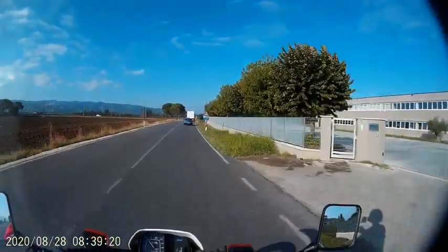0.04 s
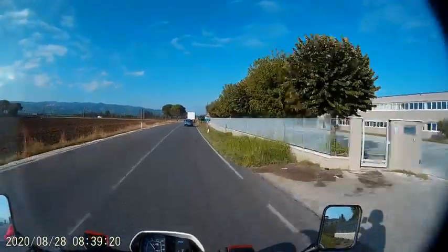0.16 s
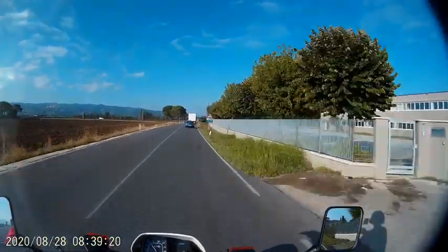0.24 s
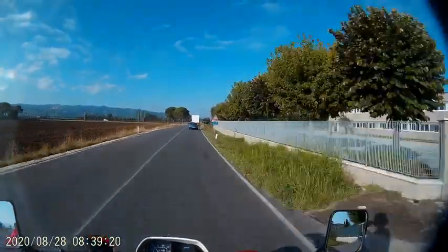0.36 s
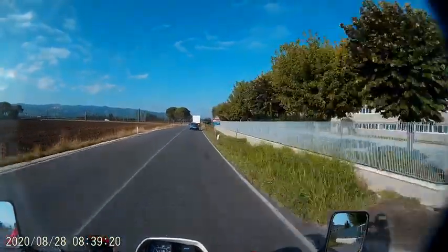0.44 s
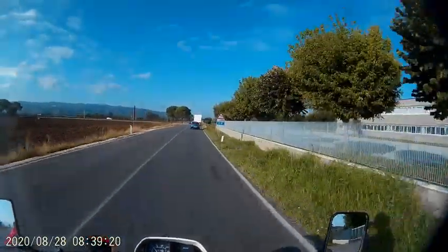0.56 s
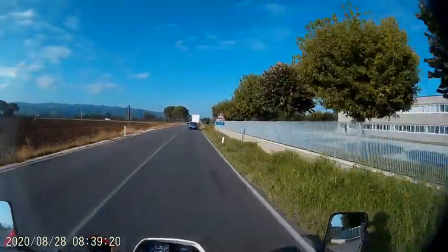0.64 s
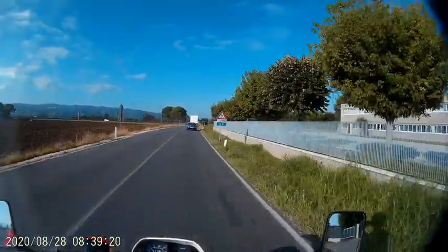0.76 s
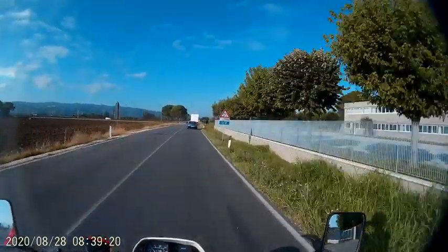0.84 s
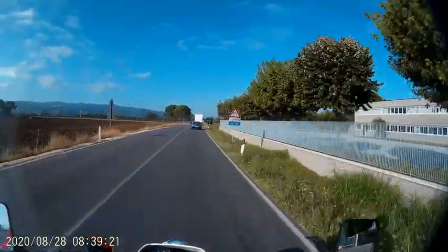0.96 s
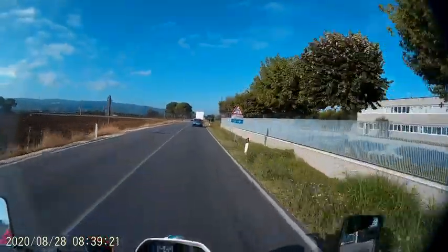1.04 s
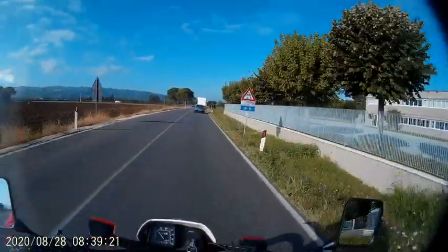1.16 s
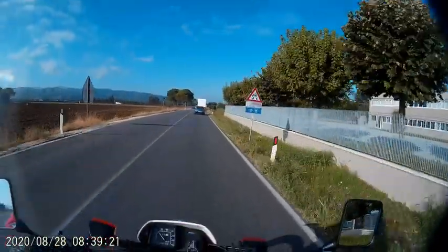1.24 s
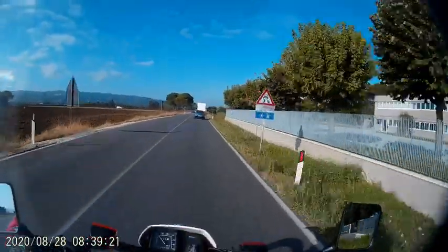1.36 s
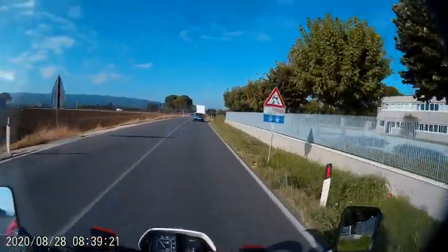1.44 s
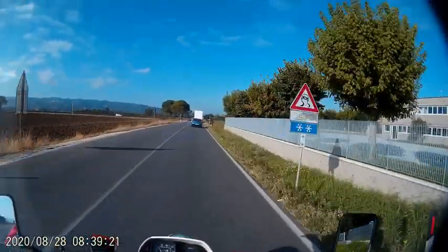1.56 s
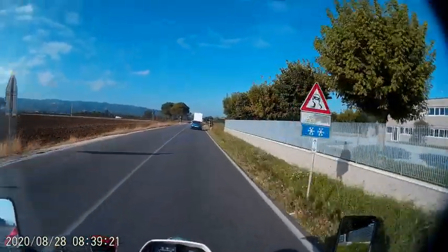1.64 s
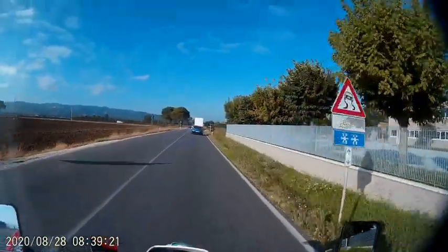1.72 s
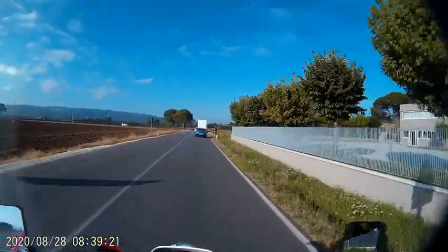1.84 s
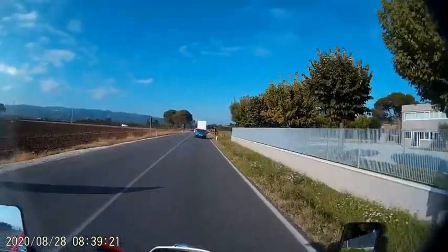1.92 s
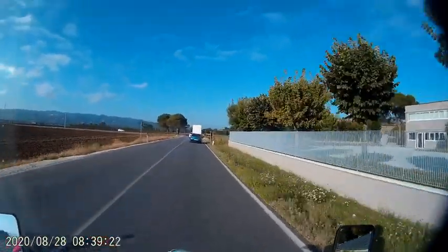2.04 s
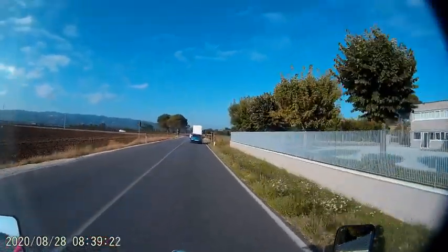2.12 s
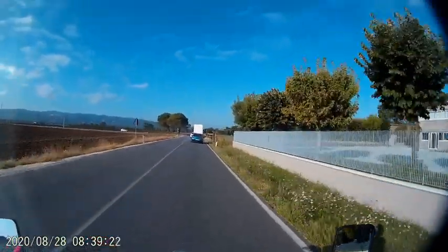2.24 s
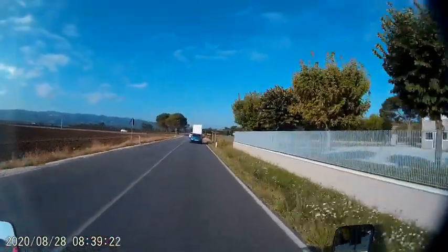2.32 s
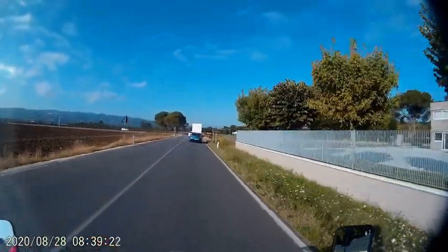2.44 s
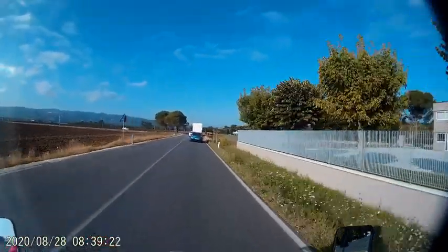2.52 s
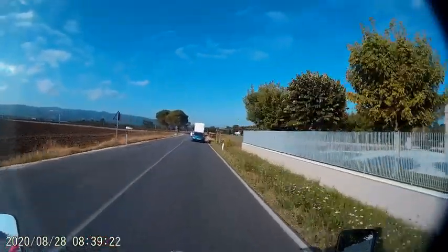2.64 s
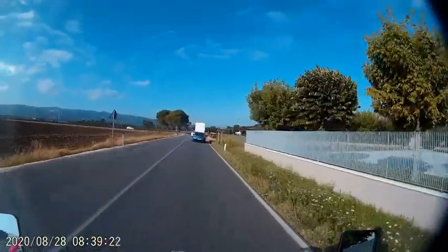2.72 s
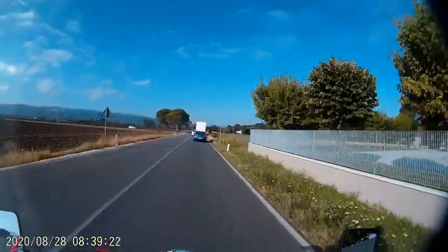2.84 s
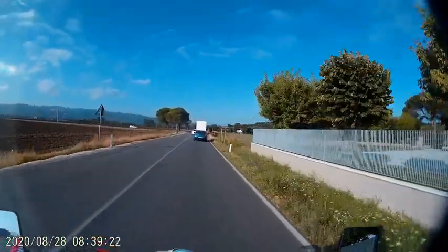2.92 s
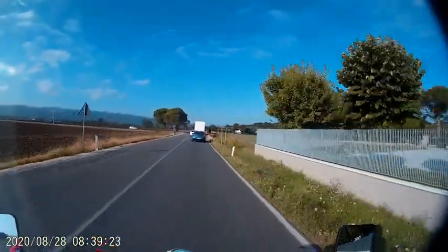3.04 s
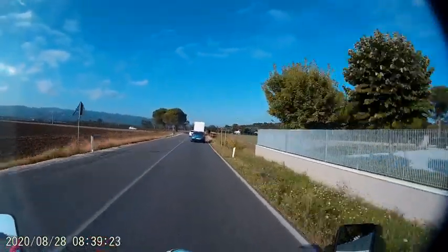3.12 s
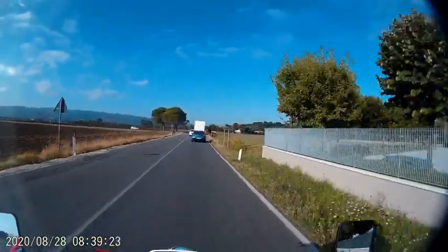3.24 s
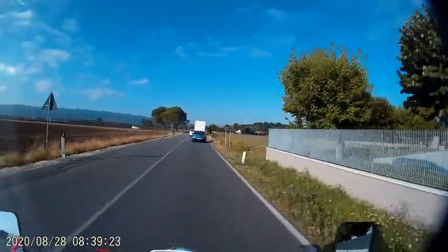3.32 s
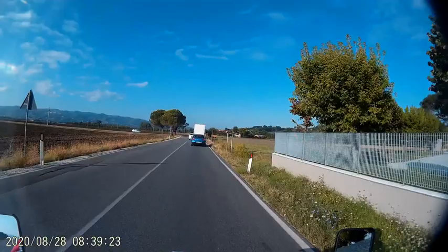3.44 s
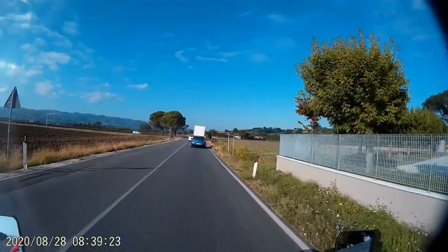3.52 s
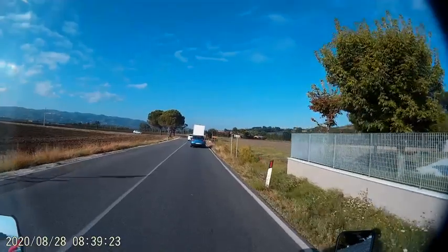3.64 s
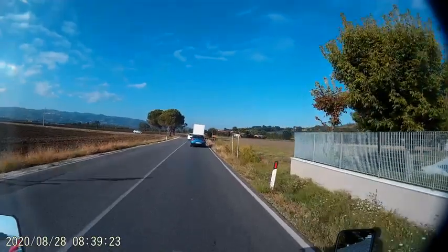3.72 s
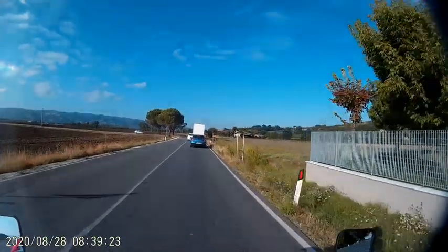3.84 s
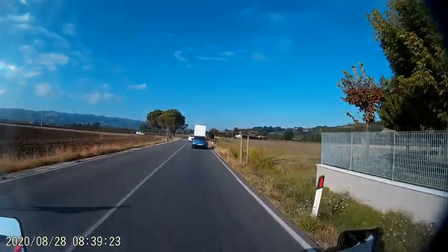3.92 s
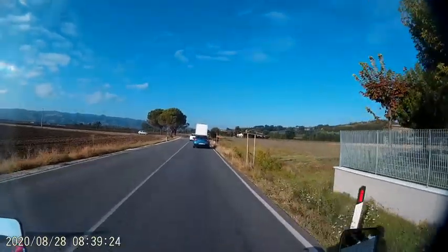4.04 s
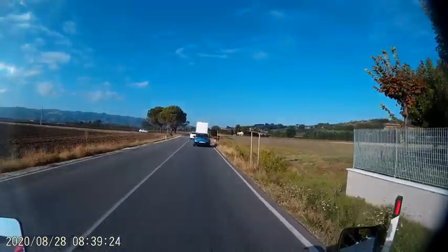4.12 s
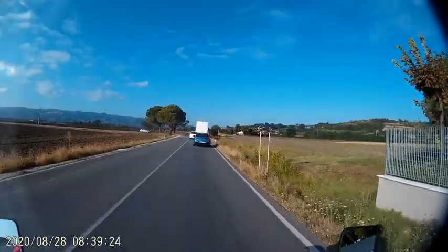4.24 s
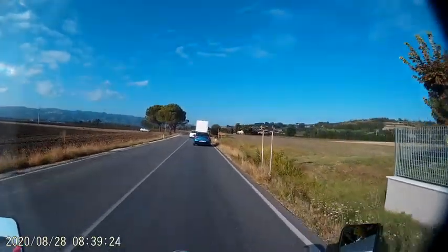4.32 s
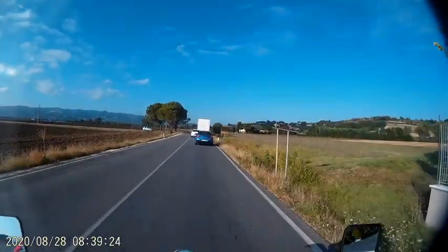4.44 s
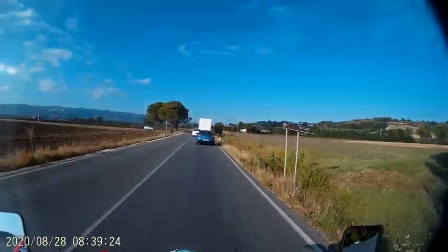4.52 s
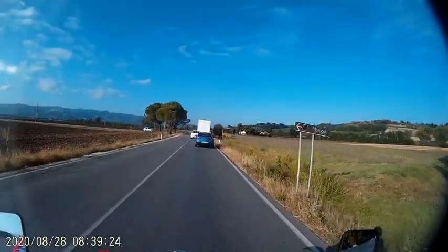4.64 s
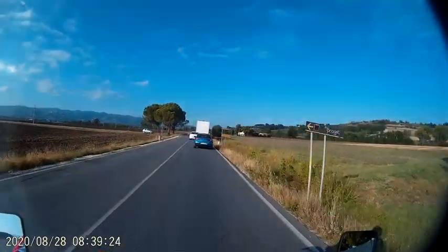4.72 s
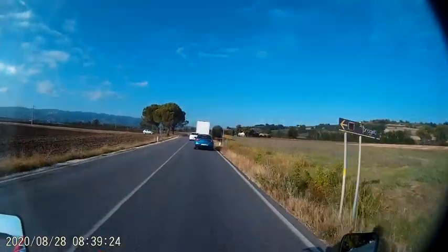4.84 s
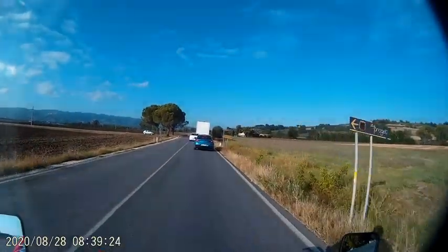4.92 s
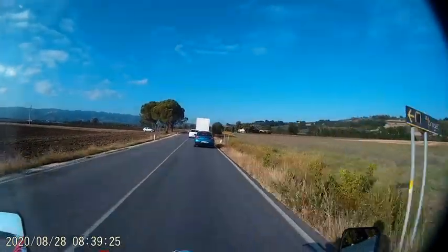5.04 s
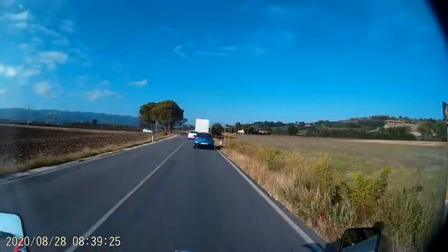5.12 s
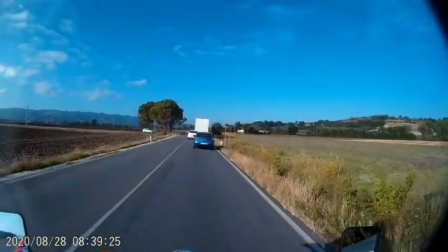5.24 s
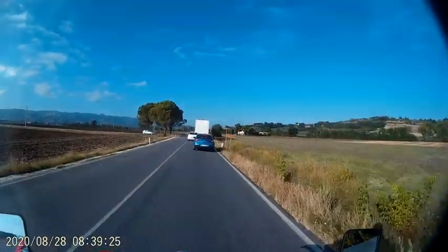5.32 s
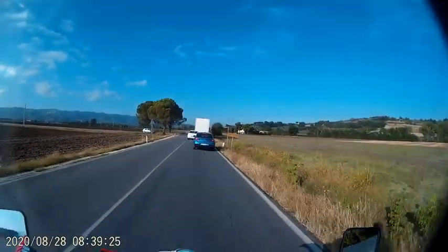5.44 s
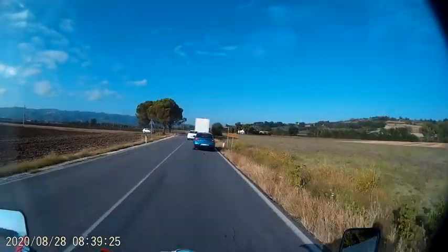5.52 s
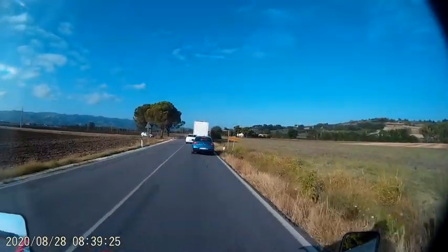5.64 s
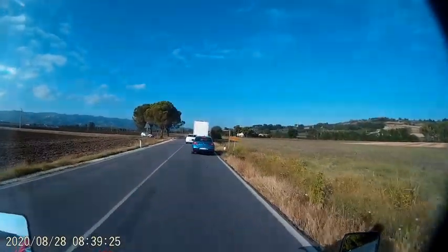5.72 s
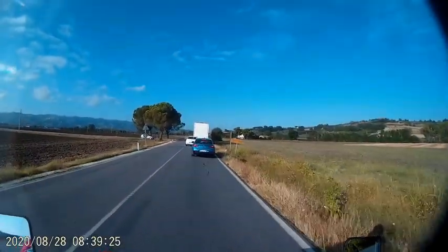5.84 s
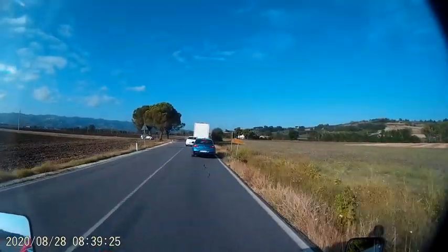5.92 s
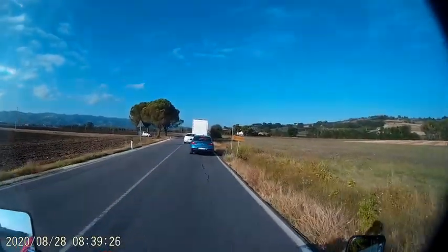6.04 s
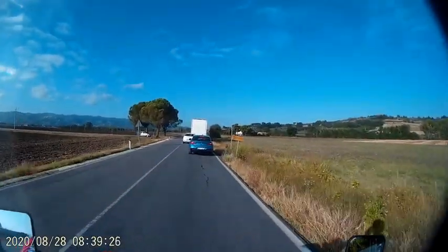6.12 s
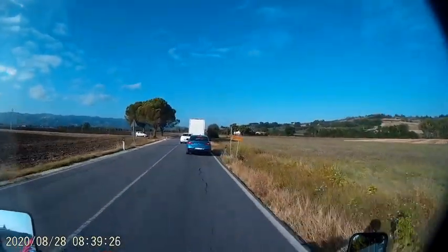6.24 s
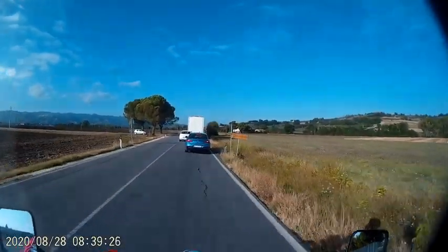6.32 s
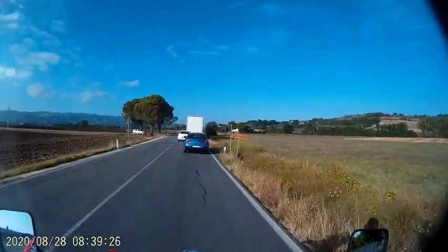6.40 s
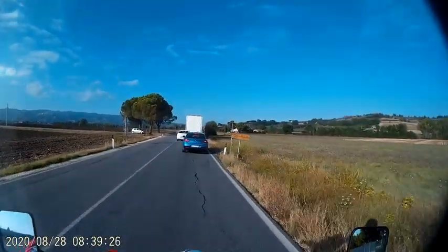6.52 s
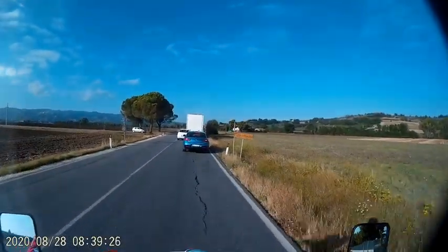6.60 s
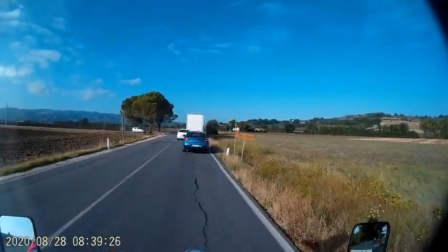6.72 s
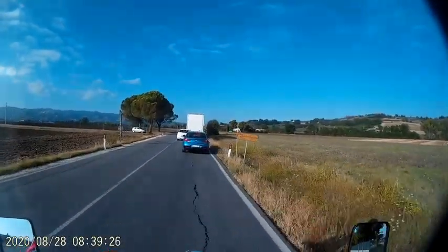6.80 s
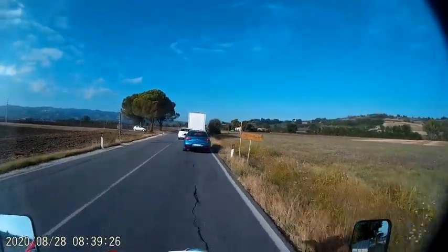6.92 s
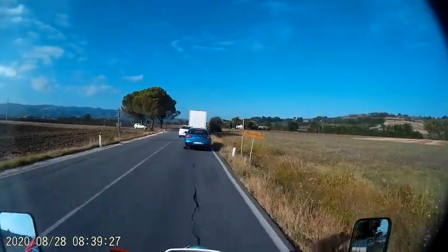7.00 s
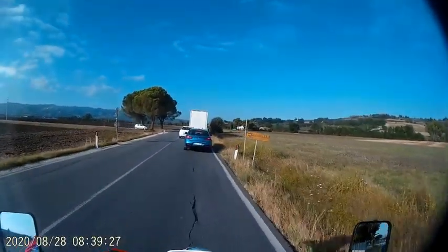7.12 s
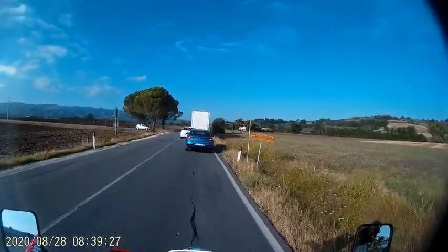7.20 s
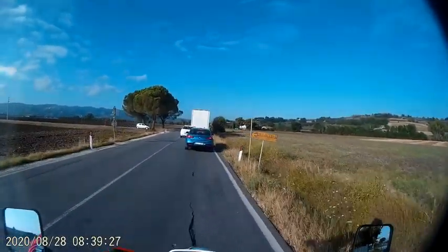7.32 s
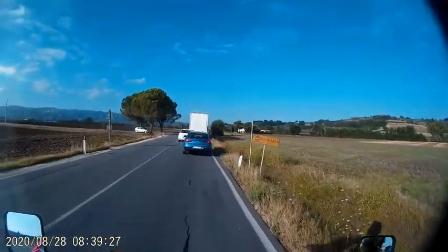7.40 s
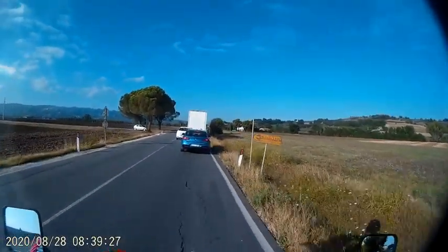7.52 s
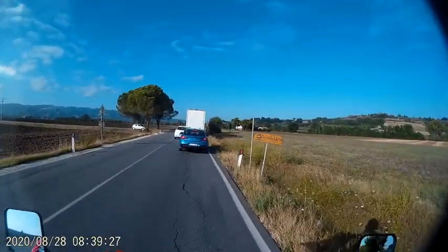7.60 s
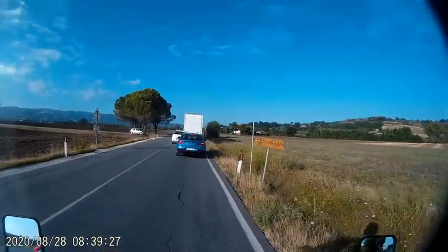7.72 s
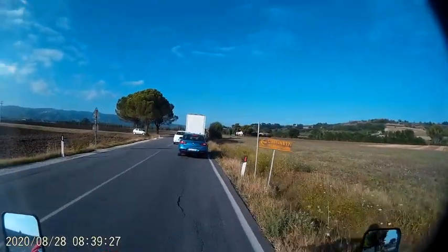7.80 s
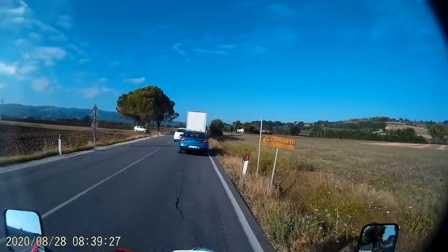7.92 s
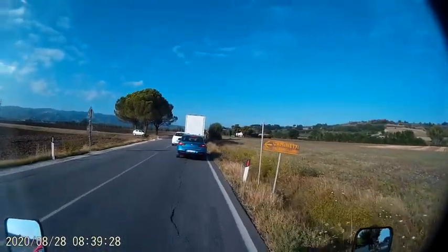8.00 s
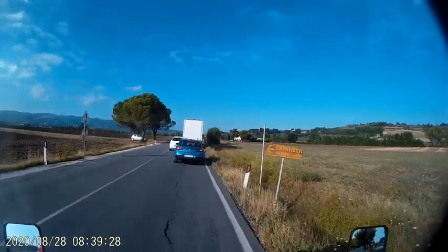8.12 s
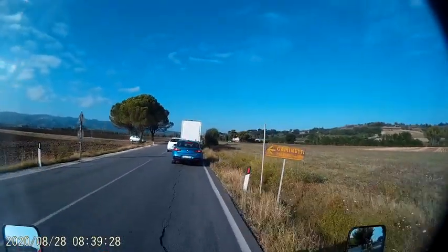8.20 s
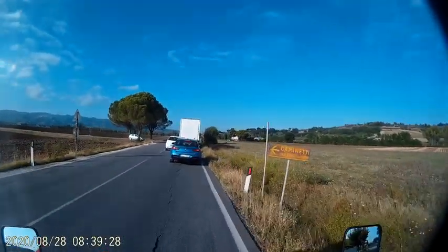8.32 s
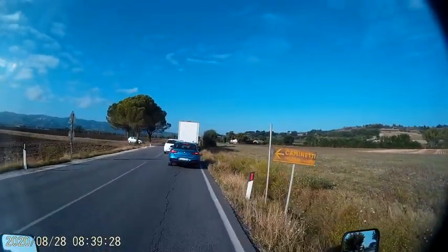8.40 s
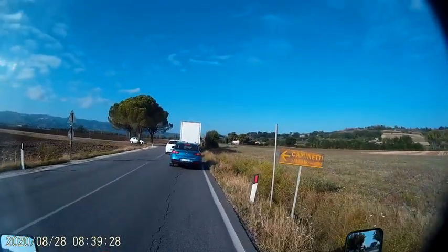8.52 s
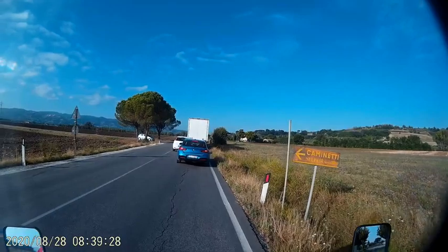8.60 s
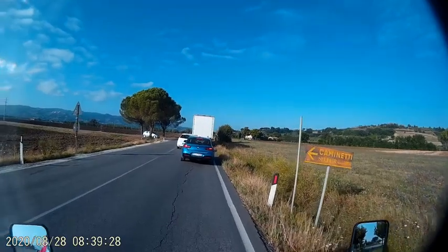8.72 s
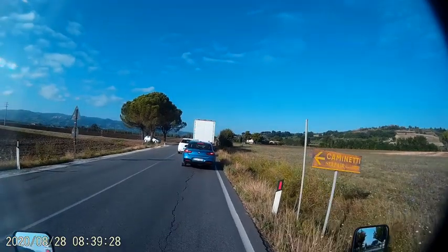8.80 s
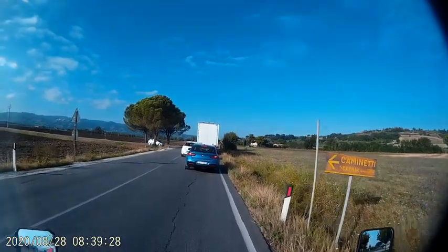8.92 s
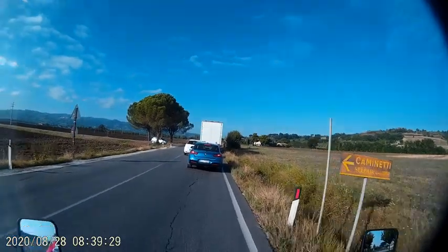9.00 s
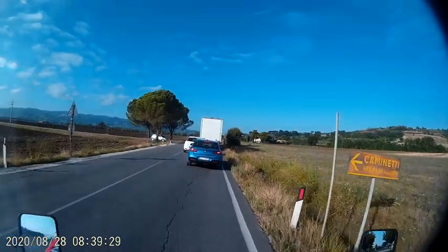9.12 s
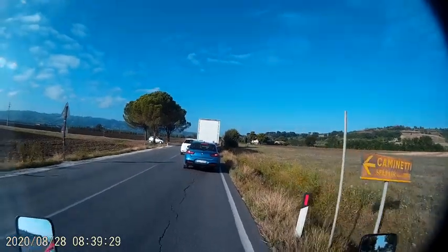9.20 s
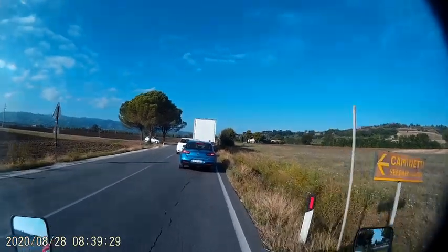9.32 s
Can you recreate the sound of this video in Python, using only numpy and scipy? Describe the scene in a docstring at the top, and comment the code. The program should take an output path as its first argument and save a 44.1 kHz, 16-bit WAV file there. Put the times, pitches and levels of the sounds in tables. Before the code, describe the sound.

A single-cylinder motorcycle slows down in buffeting wind, blips for a downshift, then coasts at idle as a distant horn toots.

```python
"""A single-cylinder four-stroke motorcycle slows on a country road, heard from a cased camera on the rider.
It rolls on a light throttle, each cycle an exhaust bark, then an intake gulp, over ticking valve gear.
Wind buffets the case, and a few hard thumps overload the preamp. Near 4 s the engine is blipped for a
downshift and a brake starts to sing faintly. The bike coasts at idle as the wind dies away; something
loose rattles at 6 and 6.6 s, and a far horn toots at 7.1 s."""
import sys
import numpy as np
from scipy import signal
from scipy.fft import rfft, irfft
from scipy.io import wavfile
from scipy.ndimage import uniform_filter1d

SR = 44100
rng = np.random.default_rng(int(sys.argv[2]) if len(sys.argv) > 2 else 0)


def dump(signal):
    """Clip the signal to [-1, 1] and save it as 16-bit WAV at the path in sys.argv[1]."""
    limited = np.clip(np.atleast_2d(signal).T, -1, 1)
    pcm = np.round(limited * 32767).astype(np.int16)
    wavfile.write(sys.argv[1], SR, pcm)


N = 412776
TIME = np.arange(N) / SR


def undb(db):
    """Decibels to gain."""
    return 10 ** (np.asarray(db) / 20)


def unit(x):
    """Scale to rms 1."""
    return x / np.sqrt(np.mean(x ** 2))


def curves(table):
    """Each column after the first, interpolated over the times in the first."""
    times_s, *columns = np.transpose(table)
    return [np.interp(TIME, times_s, column) for column in columns]


def swells(table, edge_s):
    """Sum of (start, length, height) events, each rising and falling over edge_s."""
    return sum(height * np.clip(np.minimum(TIME - start, start + length - TIME) / edge_s + .5, 0, 1)
               for start, length, height in table)


def colour(x, spectrum):
    """Filter by (Hz, dB) points; rms 1."""
    hz, db = np.transpose(spectrum)
    bins_hz = np.arange(N // 2 + 1) * SR / N
    gain = undb(np.interp(np.log(bins_hz + 1), np.log(hz), db))
    return unit(irfft(rfft(x) * gain, N))


def noise(spectrum):
    """Coloured noise; rms 1."""
    return colour(rng.standard_normal(N), spectrum)


def resonance(x, hz, width_hz):
    """Two-pole band-pass, gain 1 at the centre."""
    return signal.lfilter(*signal.iirpeak(hz, hz / width_hz, fs=SR), x)


def walk(rate_hz):
    """Random values joined by ramps; rms 1."""
    hold = int(SR / rate_hz)
    steps = np.repeat(rng.standard_normal(N // hold + 1), hold)[:N]
    return unit(uniform_filter1d(steps, hold))


def strokes(cycle, phase, db, scatter_db):
    """One impulse per engine cycle at phase (0 to 1), with random level scatter."""
    hits = np.flatnonzero(np.diff(np.floor(cycle - phase)) > 0)
    pulses = np.zeros(N)
    pulses[hits] = undb(db[hits] + scatter_db * rng.standard_normal(len(hits)))
    return pulses


def ring(pulses, modes, detune, rise_s):
    """Each impulse swells into the modes, slightly retuned every time by the changing gas."""
    hz, t60_s, db = np.transpose(modes)[:, :, None]
    t = np.arange(SR // 10) / SR
    envelope = undb(db - 60 * t / t60_s) * (1 - np.exp(-(t / rise_s) ** 2))
    out = np.zeros(N + len(t))
    for i in np.flatnonzero(pulses):
        tuned_hz = hz * (1 + detune * rng.standard_normal(hz.shape))
        out[i:i + len(t)] += pulses[i] * np.sum(envelope * np.sin(2 * np.pi * tuned_hz * t), axis=0)
    return out[:N]


def fade(pulses, decay_s):
    """Exponential tail after each impulse."""
    return signal.lfilter([1], [1, -np.exp(-1 / (decay_s * SR))], pulses)


def suction(pulses, hz, length_s):
    """A smooth pressure dip per impulse, with an overshoot on either side."""
    t = np.arange(-(SR // 20), SR // 20 + 1) / SR
    dip = -np.cos(2 * np.pi * hz * t) * np.exp(-(t / length_s) ** 2)
    return signal.fftconvolve(pulses, dip, "same")


def exhaust(cycle, db):
    """The exhaust valve lets a bark and a trailing puff of gas into the silencer."""
    # Each row: mode in Hz, t60 in seconds, level in dB.
    silencer_modes = [(273, 0.042, -42.5), (382, 0.18, -30.5), (620.6, 0.069, -18), (706, 0.13, -22),
                      (820, 0.024, -35)]
    # Each row: frequency in Hz, relative density in dB.
    gas_spectrum = [(100, -10), (300, -2), (450, 4.5), (680, 3.5), (850, -2), (1050, -11.5), (1800, -15),
                    (2600, -29), (5000, -46.5), (9000, -62.5)]
    pulses = strokes(cycle, .628, db, scatter_db=1)
    bark = ring(pulses, silencer_modes, detune=.029, rise_s=.0007)
    delayed = np.roll(pulses, int(.0088 * SR))
    puff = uniform_filter1d(fade(delayed, decay_s=.056), SR // 200)
    return bark + undb(-26) * puff * noise(gas_spectrum)


def intake(cycle, db, rev_octaves, lead_s=.00802):
    """The opening valve rings snorkel and airbox, the piston gulps, the closing valve thumps softly."""
    # Each row: mode in Hz, t60 in seconds, level in dB.
    airbox_modes = [(243, 0.13, -34), (267.8, 0.064, -12), (299.5, 0.068, -16.5), (326, 0.056, -27),
                    (505, 0.046, -29), (623, .051, -22)]
    snorkel_modes = [(306, .024, -21), (611.6, .029, -12)]
    opening = np.roll(strokes(cycle, 0, db, scatter_db=0), -int(lead_s * SR))
    chuff = ring(opening, snorkel_modes, detune=.06, rise_s=.0038)
    deep_db = .61 * db - 5 * rev_octaves  # grows less than the honk; higher revs leave it less time
    gulp = undb(-18.5) * suction(strokes(cycle, 0, deep_db, scatter_db=-2), hz=95.4, length_s=.0064)
    closing = undb(-24) * suction(strokes(cycle, .25, deep_db, scatter_db=1.5), hz=60, length_s=.004)
    honk = ring(opening, airbox_modes, detune=.017, rise_s=.0059)
    return gulp + closing + chuff + honk


def valve_gear(cycle, rev_octaves):
    """Chain and gears whirr; two tappets ring the cylinder head, harder at high revs."""
    # Softer and harder spells. Each row: start in seconds, length in seconds, change in dB.
    spells = [(.35, 0.62, -7), (1.02, 1.06, 1.5), (2.85, .66, 5), (3.55, 0.43, -4.5), (6.7, 0.65, 1.5)]
    # Each row: frequency in Hz, relative density in dB.
    whirr_spectrum = [(500, -5), (1100, 4), (1600, 2.5), (2100, 2), (2600, -8.5), (3300, -10.5),
                      (3800, -18.5), (4300, -14), (5000, -22), (5600, -31), (6100, -21.5), (7000, -22.5),
                      (8200, -30), (15000, -58.5)]
    # Each row: mode in Hz, t60 in seconds, relative level in dB.
    head_modes = [(1620, 0.017, -8), (2066, 0.026, -0.5), (3400, 0.019, -14), (4214, .03, -11)]
    db = -39 + .3 * rev_octaves + swells(spells, edge_s=.12)
    taps = sum(strokes(cycle, phase, db + 4.5 * rev_octaves, scatter_db=5) for phase in (.76, .45))
    whirr = undb(db - 6 + 2.1 * walk(rate_hz=140)) * noise(whirr_spectrum)
    return whirr + undb(-4) * ring(taps, head_modes, detune=.018, rise_s=.0032)


def wind():
    """Air rushes round the case and eddies buffet it; both die away as the bike slows."""
    # Each row: time in seconds, base rush level in dB, base buffet level in dB.
    airstream = [(0, -16.5, -15.5), (2.3, -19.5, -16), (3.3, -18.5, -20.5), (4.85, -19.5, -23.5),
                 (5.3, -23, -28), (6.4, -27.5, -36), (7.6, -32.5, -51), (9.36, -32.5, -65)]
    # Each row: start in seconds, length in seconds, rise of the rush in dB.
    gusts = [(0, 0.21, 2), (.56, .15, 4), (1.08, 0.23, 2), (2.42, 0.33, 2.5), (3.3, 0.25, 4),
             (3.66, 0.12, 3.5), (4.52, 0.49, 3.5)]
    # Each row of both: frequency in Hz, relative density in dB.
    rush_spectrum = [(120, -19.5), (175, -7), (250, -3.5), (420, 0), (560, -0.5), (730, 1.5), (850, -5),
                     (1000, -14.5), (1300, -21.5), (1900, -30.5), (2600, -46), (4200, -43), (5500, -61),
                     (7000, -52.5), (9000, -73)]
    buffet_spectrum = [(15, -6), (30, -7), (55, 0), (125, 2), (170, -0.5), (260, -0.5), (350, -7),
                       (800, -28.5), (2000, -79.5)]
    rush_db, buffet_db = curves(airstream)
    rush = undb(rush_db + swells(gusts, edge_s=.08) + walk(rate_hz=45)) * noise(rush_spectrum)
    buffet = undb(buffet_db - 1 + 1.4 * walk(rate_hz=22)) * noise(buffet_spectrum)
    return rush + buffet


def hard_knocks(gain_db=4):
    """The loudest engine beats and wind knocks: short thumps that overload the preamp and crackle."""
    # Each row: time in seconds, relative peak in dB.
    thumps = [(0.598, -3), (0.621, -4), (0.671, -5), (0.77, -4.5), (1.197, -3), (1.233, -7.5), (1.915, -5),
              (1.965, -8), (2.157, -6.5), (2.671, -3)]
    pulses = np.zeros(N)
    for time_s, db in thumps:
        pulses[int(time_s * SR)] = undb(db + gain_db)
    return suction(pulses, hz=320, length_s=.0017)


def brake(sing_hz=6804, sing_start_s=3.9, attack_s=.7, release_s=.6):
    """The pads scrape as they bite, then the disc settles into one thin note."""
    # Each row: start in seconds, length in seconds, scrape level in dB.
    bites = [(3.935, 0.28, -61.5), (4.5, 0.26, -59.5)]
    bite = swells([(start, length, undb(db)) for start, length, db in bites], edge_s=.04)
    drag = undb(-16) * fade(bite, release_s) / (release_s * SR)
    friction = rng.standard_normal(N)
    for _ in range(2):
        friction = resonance(friction, hz=6900, width_hz=460)
    scrape = (bite + drag) * undb(2.6 * walk(rate_hz=46)) * unit(friction)
    onset = np.clip((TIME - sing_start_s) / attack_s, 0, 1)
    sing = onset * np.sqrt(2) * np.sin(2 * np.pi * sing_hz * TIME)
    return scrape + undb(-66.5 + .8 * walk(rate_hz=9)) * sing


def rattles():
    """A loose part chatters: brief swells of dense clicks ring its modes."""
    # Each row: centre in seconds, level in dB, Gaussian sigma in seconds.
    bursts = [(5.953, -24.5, 0.004), (5.973, -28, 0.0061), (6.637, -24.5, 0.012)]
    # Each row: mode in Hz, width in Hz, relative level in dB.
    part_modes = [(1030, 160, -6), (1210, 150, 6), (1410, 140, 0), (1600, 85, 4), (1950, 180, 0),
                  (1980, 160, -8), (3200, 170, -9), (4200, 300, -21), (6600, 900, -31)]
    # Each row: frequency in Hz, relative gain in dB.
    dulling = [(600, 6), (1100, 3), (3500, -5), (5000, -13), (7000, -13), (9000, -17), (15000, -21.5)]
    envelope = sum(undb(db) * np.exp(-((TIME - centre_s) / sigma_s) ** 2 / 2)
                   for centre_s, db, sigma_s in bursts)
    clicks = rng.standard_normal(N) * undb(3.5 * walk(rate_hz=700))
    ringing = sum(undb(db) * resonance(clicks, hz, width_hz) for hz, width_hz, db in part_modes)
    return envelope * colour(ringing, dulling)


def horn(hz=507, start_s=7.13, end_s=7.4, edge_s=.04):
    """One short toot from the traffic ahead: harmonics of a slightly wavering pitch."""
    # Each row: harmonic number, rms level in dB.
    partials = [(2, -51), (3, -44), (4, -50), (5, -60), (6, -64), (9, -66)]
    gate = np.clip(np.minimum(TIME - start_s, end_s - TIME) / edge_s, 0, 1)
    turns = np.cumsum(hz * (1 + .0022 * walk(rate_hz=23))) / SR
    return gate * np.sqrt(2) * sum(undb(db) * np.sin(2 * np.pi * k * turns) for k, db in partials)


def scene():
    """Revs and throttle drive the engine layers; wind and small sounds lie over them."""
    # Overrun, clutch in, blip, idle. Each row: time in seconds, engine speed in rpm.
    revs = [(0, 3782), (.59, 3845), (2.33, 3214), (3.52, 2628), (3.7, 1646), (4.08, 1966), (4.35, 2368),
            (4.67, 1725), (5.16, 1350), (6.29, 1223), (6.72, 1316), (7.92, 1263), (8.49, 1319),
            (8.91, 1221), (9.36, 1327)]
    # Each row: start in seconds, length in seconds, rise of the intake in dB.
    throttle = [(1.0, 2.22, 4.5), (3.235, 0.34, 8.5), (3.93, 0.084, 13), (4.115, .265, 13.5)]
    rpm, = curves(revs)
    cycle = np.cumsum(rpm / 60 / 2) / SR  # two crank turns per cycle
    rev_octaves = np.log2(rpm / rpm.min())  # above idle
    throttle_db = swells(throttle, edge_s=.035)
    intake_db = 2 * rev_octaves + throttle_db
    exhaust_db = -1 - 3.5 * rev_octaves + .44 * throttle_db
    breathing = intake(cycle, intake_db, rev_octaves) + exhaust(cycle, exhaust_db)
    engine = breathing + valve_gear(cycle, rev_octaves)
    return (engine + wind() + hard_knocks() + brake() + rattles() + horn())[None]


def record(dry, bass_hz=18, hiss_db=-66.5, clip_level=.69, top_hz=15400):
    """The case rings; the preamp drops the deepest bass, hisses and clips; the top is cut."""
    cased = dry + undb(8) * resonance(dry, hz=2080, width_hz=145)
    thinned = signal.sosfilt(signal.butter(1, bass_hz, "high", fs=SR, output="sos"), cased)
    hissing = thinned + undb(hiss_db) * rng.standard_normal(dry.shape)
    clipped = np.clip(hissing, -clip_level, clip_level)
    faded_in = clipped * np.minimum(TIME / .004, 1)
    return signal.sosfilt(signal.ellip(8, .2, 70, top_hz, fs=SR, output="sos"), faded_in)


dry = scene()
out = record(dry)
dump(out)
```